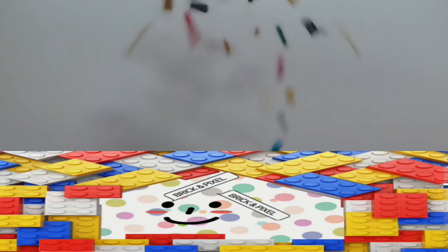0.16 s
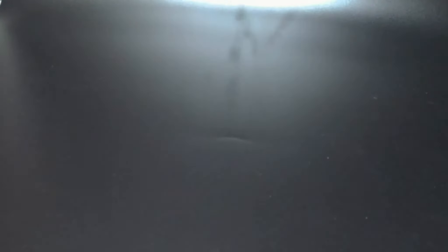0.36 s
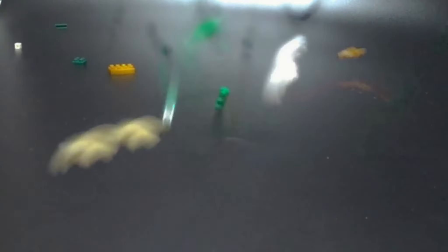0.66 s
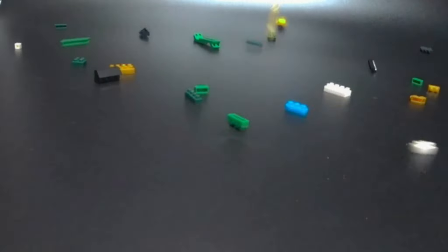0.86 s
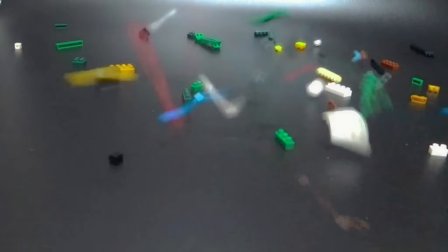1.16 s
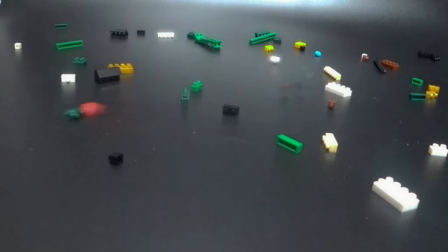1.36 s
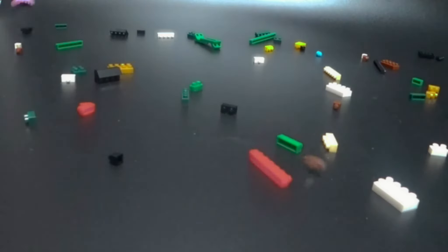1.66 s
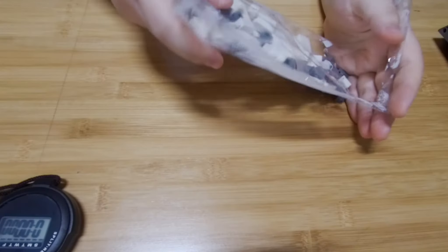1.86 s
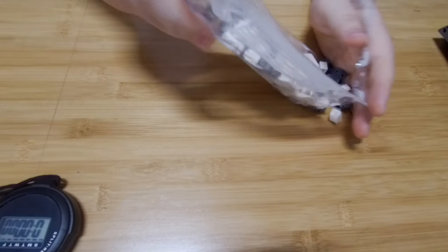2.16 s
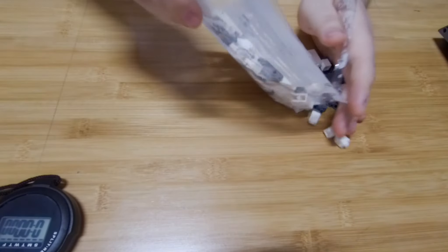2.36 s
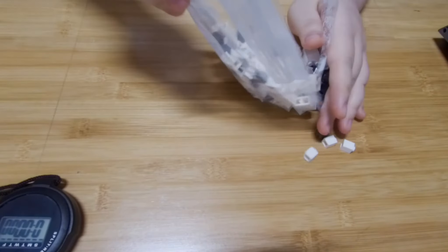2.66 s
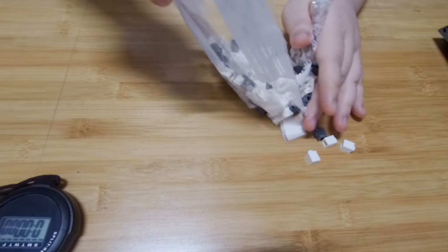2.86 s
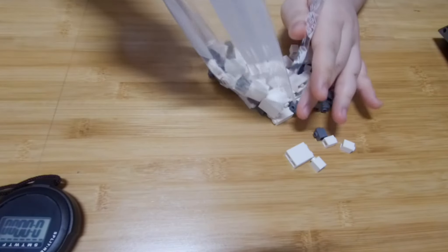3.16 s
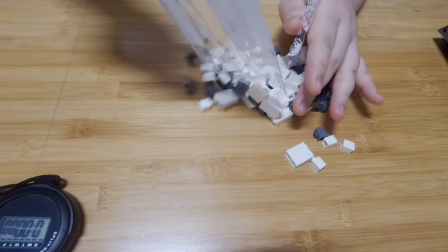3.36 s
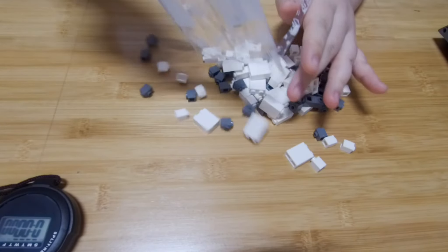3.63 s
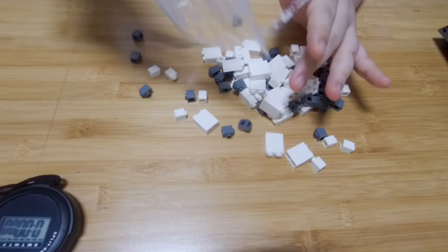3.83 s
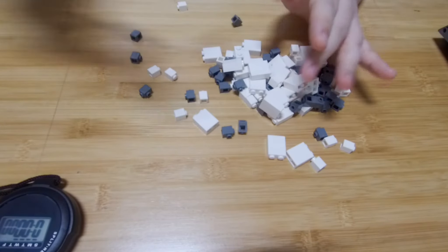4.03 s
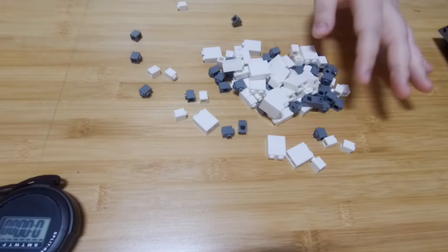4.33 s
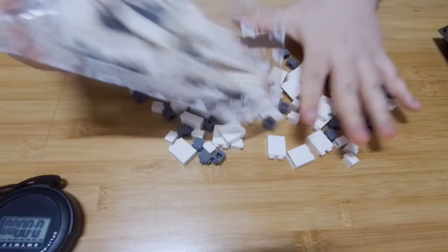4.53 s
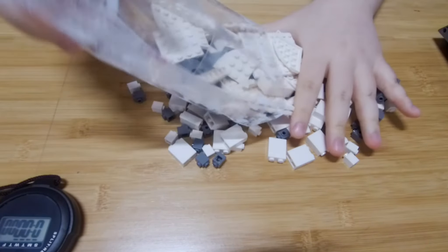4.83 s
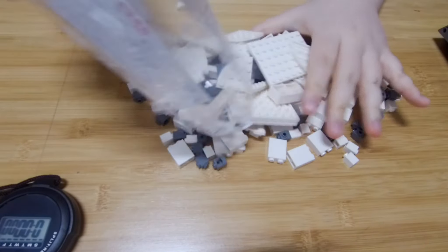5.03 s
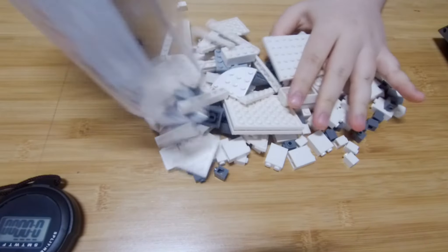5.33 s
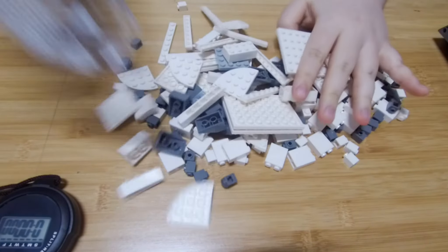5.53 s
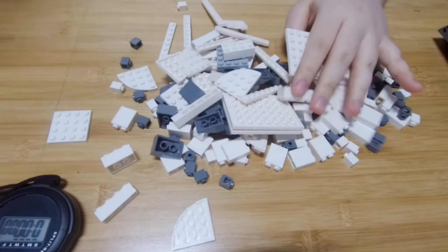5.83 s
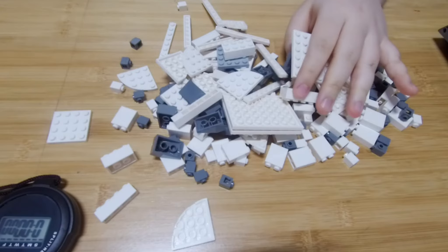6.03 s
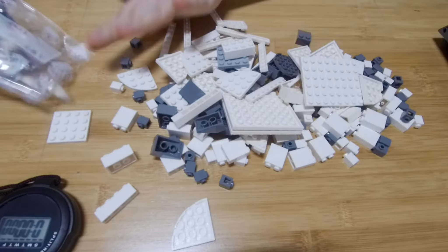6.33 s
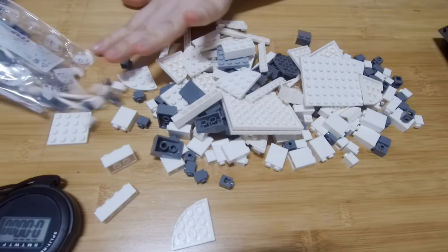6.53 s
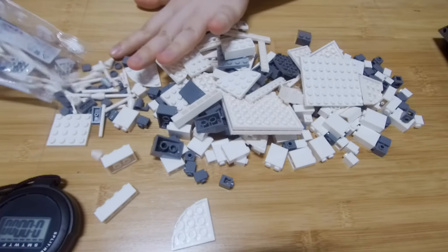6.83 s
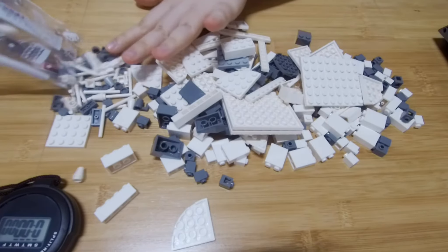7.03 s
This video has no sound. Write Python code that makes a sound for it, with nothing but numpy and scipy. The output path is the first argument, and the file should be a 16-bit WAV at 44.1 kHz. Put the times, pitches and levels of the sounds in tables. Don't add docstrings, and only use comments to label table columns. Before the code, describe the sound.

Dense, bright, crackling impacts of small plastic bricks on a hard surface, loud and close, stop abruptly. After a tiny gap, a duller indoor mono perspective: bricks slide from a crinkling plastic bag, drumming softly on wood, with one sharp clack and brief gain dropouts. A lull with faint finger taps leads to a sudden heavy slump, a thick rattling pour, a short pause, then a final softer, hissier pour.

```python
import sys
import numpy as np
from scipy import signal
from scipy.fft import rfft, irfft
from scipy.io import wavfile

SR = 44100
rng = np.random.default_rng(int(sys.argv[2]) if len(sys.argv) > 2 else 0)


def master(y):
    cut = np.clip(np.atleast_2d(y).T, -1, 1)
    pcm = np.round(cut * 32767)
    wavfile.write(sys.argv[1], SR, pcm.astype(np.int16))


def magnitude_from_level(level_db):
    exponent = np.asarray(level_db, float) / 20
    return 10 ** exponent


N = 317079

# time in seconds, peak in dB, brick pitch in Hz,
# brightness in dB.
BRICK_LANDINGS = [(0.0439, -3.5, 6520, 4), (0.0752, -5.5, 6540, 2), (0.0808, -7, 2650, 7),
                  (0.0932, -5.5, 3510, -1), (0.1159, -3, 3560, 0.5), (0.1329, -6, 7800, 13),
                  (0.1428, -2, 2690, -7.5), (0.1479, -17, 2690, 4), (0.1853, -8, 2930, 0),
                  (0.1907, -11.5, 2850, -3), (0.1958, -3.5, 2860, 12), (0.2146, -6, 9190, 17),
                  (0.2237, -6, 3230, -3.5), (0.2345, -5, 2710, 6), (0.2459, -7, 3250, -1.5),
                  (0.2582, -13.5, 3800, 3), (0.2628, -2, 3570, 0), (0.2683, -13, 3940, -2),
                  (0.2757, -7, 5800, 4), (0.2838, -6.5, 2610, 5.5), (0.2959, -6, 3920, 0.5),
                  (0.3154, -2.5, 2910, -5.5), (0.3204, -10.5, 11110, 6), (0.3313, -10, 2930, 7.5),
                  (0.3355, -3.5, 2860, 7), (0.3465, -6.5, 3960, 2), (0.3518, -3, 2860, 3.5),
                  (0.3622, -16.5, 11390, 2), (0.3764, -13.5, 14000, 8), (0.3804, -15.5, 2930, 1),
                  (0.3927, -17, 2610, 0.5), (0.3999, -13, 3320, -7), (0.4043, -5.5, 2890, -3.5),
                  (0.4202, -6.5, 8660, 8.5), (0.4258, -7, 5700, 3), (0.431, -2.5, 7580, 9.5),
                  (0.4349, -11, 3900, 8), (0.4516, -14, 3500, -0.5), (0.456, -16.5, 7350, 1),
                  (0.4611, -5.5, 2930, 7),
                  (0.4863, -8, 13500, 3), (0.4971, -2.5, 3550, -1), (0.5102, -2, 2830, -1.5),
                  (0.5245, -4.5, 2880, -6), (0.5362, -2.5, 2930, -1.5), (0.5533, -4.5, 3850, -1.5),
                  (0.5602, -2.5, 2980, -3), (0.5779, -2.5, 5560, 3.5), (0.584, -1, 5700, -1.5),
                  (0.5936, -4.5, 3850, -4.5), (0.6063, -8, 4100, 3), (0.6107, -1.5, 7600, -3),
                  (0.6172, -10, 4100, 3), (0.634, -4.5, 3810, 0), (0.6423, -3.5, 6360, -1.5),
                  (0.6465, -5, 7690, 0), (0.6573, -9.5, 6930, 6), (0.6607, -4, 2970, 2.5),
                  (0.664, -2.5, 2930, -2.5), (0.676, -5, 2930, 2), (0.6865, -6.5, 3530, -2.5),
                  (0.694, -5.5, 3530, 2.5), (0.7015, -10.5, 5620, 3.5), (0.7057, -6.5, 5640, 7.5),
                  (0.7175, -8, 6500, -2), (0.7235, -5, 3090, 1.5), (0.7301, -6.5, 3810, 3),
                  (0.735, -9, 2900, 1), (0.7465, -8, 5400, 3.5), (0.7536, -9, 9320, 5.5),
                  (0.7588, -6, 9520, 9.5), (0.7769, -4, 2910, 1.5), (0.783, -5.5, 9630, 5.5),
                  (0.8014, -10, 11630, 4.5), (0.821, -5, 6550, 3), (0.8306, -9.5, 5560, -2.5),
                  (0.8357, -8.5, 6960, -2), (0.8447, -9, 6480, -2), (0.8589, -9, 6840, 8.5),
                  (0.879, -7, 6850, 1), (0.8912, -1.5, 5430, -2.5), (0.8975, -10, 3960, -3.5),
                  (0.9178, -15.5, 8600, -5.5), (0.9224, -2.5, 3490, 3),
                  (0.984, -3.5, 5600, 3.5), (0.9998, -4.5, 3900, -2), (1.0058, -5, 6740, 11),
                 (1.0146, -8, 2740, 14), (1.0239, -11, 5100, 1.5), (1.0432, -2.5, 2920, 0),
                 (1.0601, -6, 7710, 2), (1.0742, -3.5, 3130, -0.5), (1.078, -9, 3080, -6),
                 (1.0882, -10, 2800, 6), (1.0969, -9.5, 6610, -3), (1.1066, -4, 3870, -2),
                 (1.1305, -4.5, 3540, 7), (1.1411, -4.5, 2900, 1.5), (1.1587, -3, 2900, 1.5),
                 (1.175, -12, 5700, -2), (1.1795, -2, 8600, 4.5), (1.199, -3.5, 2950, 2.5),
                 (1.2108, -6, 3010, -1), (1.216, -2.5, 2930, -3.5), (1.2276, -9, 5280, 10),
                 (1.2328, -9.5, 5660, 7), (1.2376, -6.5, 7600, 7), (1.2455, -6, 7190, 20),
                 (1.2634, -9.5, 3550, 14), (1.2691, -10, 2930, 13), (1.2746, -5, 2930, -1),
                 (1.2839, -4.5, 12000, 7), (1.2921, -6, 11300, 9), (1.2984, -11, 6700, 5),
                 (1.303, -8, 4770, 11), (1.3081, -11, 3510, 4), (1.3173, -5.5, 5950, 7.5),
                 (1.3277, -7, 2930, 5), (1.339, -2.5, 13000, 10), (1.352, -6.5, 6580, 11),
                 (1.3654, -6.5, 2820, 6), (1.374, -5.5, 2930, -2), (1.3871, -4, 5720, 3.5),
                 (1.42, -7, 2860, 1), (1.4303, -2.5, 6120, 7.5), (1.4368, -5.5, 3290, 2.5),
                 (1.448, -3.5, 2840, -1), (1.4675, -5, 5550, 8), (1.4767, -10, 2880, -4),
                 (1.4882, -11.5, 6330, 10), (1.4953, -7.5, 13500, 11.5), (1.5007, -4.5, 7860, 9)]
# time in seconds, level in dB.
FIRST_BOUNCES = [
    (0.2, -59),
    (0.24, -24),
    (0.37, -28),
    (0.44, -17),
    (0.47, -41.5),
]
SECOND_BOUNCES = [
    (0.49, -52),
    (0.51, -14.5),
    (0.6, -12),
    (0.8, -13),
    (0.9, -19),
    (0.965, -25.5),
]
THIRD_BOUNCES = [
    (0.982, -31),
    (1.0, -20),
    (1.12, -21),
    (1.2, -15),
    (1.36, -18.5),
    (1.41, -20),
    (1.51, -20),
]
# pitch in Hz, level in dB, seconds to fall by 60 dB.
HARD_TABLE_NOTES = [(485, -24, 0.25), (739, -13.5, 0.073), (980, -2, 0.06), (1236, -25, 0.11),
                    (1710, -10.5, 0.015), (2930, -1.5, 0.0089), (3540, -15, 0.035)]
# frequency in Hz, level in dB.
DROP_TONE = [(60, -47.5), (350, -28), (800, -9.5), (1900, -3), (3000, -3), (5500, -5), (9000, -4.5),
             (15000, -6)]
# frequency in Hz, width in Hz, boost in dB.
REFLECTION_DIPS = [(1464, 130, -6), (2250, 200, 0.5), (4230, 420, -5.5)]
# frequency in Hz, lead in radians.
PORT_LEAD = [(0, 0), (430, .6), (1290, 2.8), (2200, 3.5), (3100, 4.1), (4000, 6.8), (6000, 7.2),
             (16400, 6.8)]
# frequency in Hz, left minus right in dB.
PORT_LEVELS = [(60, -2), (180, 18.5), (550, 7), (1650, 9), (4970, 0.5), (15000, -2)]

# time in seconds, clatter level in dB.
FIRST_TIP_FLOW = [(1.688, -41.5), (1.8, -35.5), (1.95, -31.5), (2.2, -33.5), (2.29, -43.5), (2.42, -37),
                  (2.49, -30.5), (2.55, -36), (2.63, -34)]
FIRST_SHAKE_FLOW = [(2.7, -43.5), (2.8, -34), (2.9, -37.5), (2.99, -34), (3.2, -32.5), (3.4, -35.5),
                    (3.5, -35), (3.6, -45), (3.65, -62)]
SLUMP_FLOW = [(4.263, -18), (4.305, -16.5), (4.315, -10.5), (4.345, -14), (4.36, -25), (4.42, -35.5),
              (4.49, -45.5)]
SECOND_POUR_FLOW = [(4.51, -37), (4.63, -28), (4.695, -20.5), (4.82, -25), (5.1, -28.5), (5.23, -24),
                    (5.36, -32.5), (5.6, -36.5), (5.66, -51)]
HAND_PRESS_FLOW = [(5.67, -81), (5.68, -59), (5.746, -49.5), (5.758, -54), (5.8, -34.5), (5.87, -44.5)]
THIRD_POUR_FLOW = [(5.873, -45), (6.05, -37.5), (6.14, -33.5), (6.31, -31.5), (6.6, -31.5), (6.88, -32.5),
                   (7.0, -38), (7.13, -45), (7.19, -41)]
USUAL_FLOW = [-37, -30, -35]
# frequency in Hz, level in dB per Hz.
BRICK_TONES = [
    [(1060, -52), (1800, -8), (2650, -5.5), (3720, -0.5), (8170, -2), (8940, -2.5), (15300, -9)],
    [(1060, -34), (1800, -10), (2480, -16), (3620, -2), (6590, -3), (11600, -3.5), (15300, -10.5)],
    [(1060, -12.5), (1800, -14), (2480, -14), (3300, -12), (5460, -9.5), (8780, -8.5), (11900, -7.5),
     (15300, -12)],
]
# frequency in Hz, width in Hz, boost in dB.
SHARED_PITCHES = [
    [(3700, 210, 2.5), (5430, 180, 3), (8870, 190, 9)],
    [(3560, 200, 4)],
    [(2780, 250, 4.5), (5300, 330, 2.5), (11920, 530, 11.5), (14600, 270, 6)],
]
# frequency in Hz, level in dB per Hz.
WOOD_TONES = [
    [(24, -45), (40, -5), (146, -13.5), (259, 3), (394, -5.5), (569, -6.5), (779, 0), (1210, -6.5),
     (1540, -2.5), (2600, -15), (3380, -31), (5720, -120)],
    [(24, -35), (40, -21), (162, -15.5), (255, -1.5), (430, -13), (766, -8.5), (995, -12.5), (1460, -10),
     (2600, -21.5), (3380, -23), (5720, -120)],
    [(24, -46), (40, -20), (283, 0), (331, -8.5), (401, -4.5), (469, -5.5), (912, -4.5), (1620, -4),
     (2600, -24), (3380, -36), (5720, -120)],
]
# frequency in Hz, width in Hz, boost in dB.
WOOD_NOTES = [
    [(773, 60, 3.5), (1500, 140, 3)],
    [(248, 27, 1), (1440, 68, 1)],
    [(408, 18, 10.5), (1670, 180, 6.5)],
]
# level in dB at usual flow, change in dB per dB of flow.
DRUMMING_SHARE = [(-5, -0.02), (-6, -0.397), (-8.5, -0.3)]
FLAT_PIECES = [-14, -4, -16]
# time in seconds, shared pitches in dB, wood notes in dB.
ALIKE_AND_BARE = [(1.7, -4, 3), (2.2, -2, 3), (2.4, -3, -12), (2.95, 2, -12), (3.28, 2, -10),
                  (3.35, -10, -8), (4.9, 0, 0), (5.9, -3, 1), (6.5, 1, 0), (6.9, 0, 0), (7.19, -5, -3)]
# time in seconds, swell in dB.
SLIPPING_CLUMPS = [(1.713, 9.5), (1.729, 7), (1.792, 5), (1.832, 3.8), (1.932, 6.5), (1.991, 4.7), (2.021, 5),
                   (2.115, 9), (2.224, 6), (2.309, 13.5), (2.36, 6.5), (2.385, 4), (2.426, 9), (2.487, 9),
                   (2.567, 2), (2.602, 4), (2.63, 5), (2.681, 6.9), (2.702, 5.5), (2.732, 4), (2.801, 6),
                   (2.899, 5), (2.979, 6), (2.998, 7), (3.044, 7.5), (3.117, 3.5), (3.15, 4), (3.165, -0.5),
                   (3.215, 3.5), (3.25, 6.5), (3.271, 3), (3.285, 3.5), (3.42, 3), (3.493, 5), (3.559, 1),
                   (3.595, 2.5),
                   (4.448, 5.5), (4.558, 5), (4.7, 3.5), (4.833, 4.5), (4.947, 3.1), (4.966, 4.5), (4.982, 4),
                (5.024, 3), (5.044, 4), (5.117, 5), (5.182, 3.5), (5.202, 1), (5.234, 4), (5.252, 5),
                (5.33, 4), (5.368, 4.5), (5.414, 2), (5.45, 3), (5.505, 5.5), (5.56, 4), (5.595, 3.5),
                (5.706, 4), (5.742, 4), (5.801, 5), (5.844, 4.5), (5.923, 3.3), (6.045, 8.5), (6.098, 7),
                (6.141, 8.5), (6.162, 3.6), (6.306, 4.5), (6.378, 3), (6.392, 1.5), (6.502, 0),
                (6.579, 3.5), (6.832, 0.5), (6.892, 2.5), (6.911, 4), (7.055, 3), (7.077, 4.6)]
# time in seconds, peak in dB, pitch in Hz.
SINGLE_CLACKS = [(1.6931, -25, 8900), (1.7884, -26, 4070), (1.9298, -27, 3700), (2.3546, -20, 5720),
                 (2.383, -21.5, 5300), (2.478, 3, 8870), (4.264, -17, 3500), (4.831, -20, 11600),
                 (5.1031, -12, 3400), (5.2001, -13, 5800), (5.2213, -7.5, 11300), (5.7384, -23.5, 3520),
                 (5.44, -22, 4200), (6.0435, -24, 12200), (7.0527, -24.5, 6900), (7.187, -29, 9000)]
# time in seconds, peak in dB, pitch in Hz, table share in dB.
FINGER_TAPS = [(3.857, -37, 9300, -27), (3.873, -31.5, 2420, -1), (3.888, -42, 1500, -5),
               (3.937, -39, 2680, -4), (3.96, -42, 1700, -5), (3.997, -52, 1990, 2),
               (4.249, -26, 13700, -17), (4.445, -19, 8340, -11), (4.036, -30, 2840, 0.5),
               (4.054, -28, 2500, -2), (4.064, -35, 4550, -4), (4.092, -40, 2000, 1),
               (4.113, -40, 2740, -3), (4.127, -43, 3300, -6), (4.186, -44, 1600, -2),
               (4.203, -48, 3500, -5), (4.173, -37, 3100, -3), (5.682, -30, 5430, -16),
               (5.702, -23, 8340, -16)]
# start in seconds, length in milliseconds.
GAIN_DROPS = [(1.783, 2.9), (1.8362, 4.1), (1.907, 2.4), (1.9385, 1.8), (1.9962, 2.8), (2.0939, 2.1),
              (2.4502, 6.7), (2.4655, 16.2), (2.572, 11.5), (2.634, 28.4), (2.688, 6.3), (2.7368, 9.7),
              (2.767, 15), (2.9137, 2.5), (2.923, 12.7), (2.9416, 23.4), (3.0025, 19), (3.0689, 11),
              (3.1218, 20), (3.224, 12.6), (3.344, 20), (3.425, 14), (3.5312, 9.5), (3.57, 16.5),
              (4.5816, 6.3), (4.666, 1.6), (4.7984, 5.7), (5.028, 4.7), (5.091, 4.1), (5.1602, 12.1),
              (5.1884, 2.2), (5.2378, 2.2), (5.334, 16), (5.3814, 9.5), (5.4268, 6.1), (6.0208, 11),
              (6.2625, 2.1), (6.347, 1.7), (6.8669, 2.4), (6.896, 8.7), (6.941, 2.5), (7.135, 7.3)]

# time in seconds, level in dB.
TABLE_NUDGES = [(1.27, -55), (2.75, -55), (3.6, -54), (4.65, -50), (5.78, -55)]
# frequency in Hz, level in dB per Hz.
FIRST_ROOM = [(20, -5), (60, -0.5), (200, -3), (1500, -10), (2800, -8.5), (4200, -20), (15300, -30)]
# frequency in Hz, level in dB per Hz.
SECOND_ROOM = [(15, -29), (25, -9), (64, -6), (81, -6.5), (296, -18), (661, -15.5), (1440, -20.5),
               (2530, -22.5), (12000, -26), (15300, -22)]

SHOT_END_S, SHOT_START_S = 1.508, 1.688


def rain_of_bricks():
    drops = BRICK_LANDINGS
    brightness_db = np.array(drops)[:, 3]
    near, tail = bricks(drops, rise_s=.0004, crack_s=.0028, ring_s=.013, ring_db=-9,
                        tail_s=.052, tail_db=-14, bright_db=1.18 * brightness_db - 2)
    (bounce_db,), span = in_time([*FIRST_BOUNCES, *SECOND_BOUNCES, *THIRD_BOUNCES])
    bounce_level = span * magnitude_from_level(bounce_db - 7 + 1.8 * drift(28))
    bounces = grains(1200, spread_db=3.5, t60=.01, crack_db=0, patchy_db=2.1, size=N // 4)
    wash = magnitude_from_level(-7) * bounce_level * rng.standard_normal((2, N))

    weight_db = -.8 * brightness_db
    table = np.zeros(N)
    for hz, db, t60 in HARD_TABLE_NOTES:
        table += magnitude_from_level(db) * ring(strikes(drops, weight_db - 24, spread_db=2.5), hz, t60)
    table = signal.sosfilt(signal.butter(3, 420, "high", fs=SR, output="sos"), table)

    boosts = [(hz, 2.1 / t60, 4) for hz, db, t60 in HARD_TABLE_NOTES] + REFLECTION_DIPS
    direct = colour(near + bounce_level * bounces, DROP_TONE, boosts)
    diffuse = colour(tail + wash, DROP_TONE, boosts)
    return ports(magnitude_from_level(4.5) * direct + table) + magnitude_from_level(5.5) * diffuse


def bricks(hits, rise_s, crack_s, ring_s, ring_db, tail_s, tail_db, bright_db=0):
    t = np.arange(3000) / SR
    noise = np.zeros((2, 3, N + t.size))
    tones = np.zeros(N + t.size)
    rise = np.minimum(t / rise_s, 1) ** 2
    late = (t - rise_s).clip(0)
    shape = rise * decay(late, crack_s)
    for (s, db, hz, *_), bright in zip(hits, np.broadcast_to(bright_db, len(hits))):
        here = slice(round(s * SR), round(s * SR) + t.size)
        ratios = magnitude_from_level(rng.normal(0, [[.05], [2], [4], [4]]))
        heights = magnitude_from_level(rng.normal([[0], [-6], [-6], [-6]], 2))
        pitches = np.minimum(hz * ratios, 15500)
        notes = (heights * np.sin(2 * np.pi * pitches * t)).sum(0)
        tones[here] += magnitude_from_level(db + ring_db) * rise * notes * decay(late, ring_s)

        crack, shared, *own = rng.standard_normal((4, t.size))
        crack = rms_one(crack * shape) * np.sqrt(np.mean(shape ** 2))
        tail = magnitude_from_level(tail_db) * rise * (np.array(own) + .55 * shared) * decay(late, tail_s)
        half_db = np.minimum([[[-bright]], [[bright]]], 0)
        noise[..., here] += magnitude_from_level(db + half_db) * [crack, *tail]
    dull, bright = noise
    if np.any(bright_db):
        low_pass = signal.butter(2, 5500, "low", fs=SR, output="sos")
        high_pass = signal.butter(2, 5500, "high", fs=SR, output="sos")
        noise = signal.sosfilt(low_pass, dull + 1e-18) - signal.sosfilt(high_pass, bright + 1e-18)
    else:
        noise = dull
    return (noise[0] + tones)[:N], noise[1:, :N]


def ports(x):
    hz = np.fft.rfftfreq(N, 1 / SR)
    lead = np.interp(hz, *np.transpose(PORT_LEAD))
    half = np.sqrt(magnitude_from_level(at_hz(PORT_LEVELS, hz))) * np.exp(.5j * lead)
    return irfft(rfft(x) * np.array([half, 1 / half]), N)


def pours():
    out = np.zeros(N)
    lumps_db = 1.1 * drift(70) + surging()
    clatter = grains(3500, spread_db=3.5, t60=.014, crack_db=-1, patchy_db=3.3, size=N)
    clatter += magnitude_from_level(-3.5) * rng.standard_normal(N)
    plates = grains(350, spread_db=4, t60=.035, crack_db=-9, patchy_db=7, size=N)
    crackle = np.gradient(film_snaps())
    drumming = rng.standard_normal(N) * magnitude_from_level(1.2 * drift(25))
    (same_db, bare_db), _ = in_time(ALIKE_AND_BARE)
    flows = [[*FIRST_TIP_FLOW, *FIRST_SHAKE_FLOW],
             [*SLUMP_FLOW, *SECOND_POUR_FLOW, *HAND_PRESS_FLOW],
             THIRD_POUR_FLOW]
    for bag, flow in enumerate(flows):
        (level_db,), span = in_time(flow)
        film_db = -.4 * (level_db + 36)
        rustle = clatter + magnitude_from_level(FLAT_PIECES[bag]) * plates + magnitude_from_level(film_db) * crackle
        plain = colour(rustle, BRICK_TONES[bag])
        pitched = colour(rustle, BRICK_TONES[bag], SHARED_PITCHES[bag])
        top = rms_one(plain + magnitude_from_level(same_db + 2.5 * drift(25)) * (pitched - plain))

        dull = colour(drumming, WOOD_TONES[bag])
        ringing = colour(drumming, WOOD_TONES[bag], WOOD_NOTES[bag])
        low = rms_one(dull + magnitude_from_level(bare_db) * (ringing - dull))
        share_db, slope = DRUMMING_SHARE[bag]
        wood_db = share_db + slope * (level_db - USUAL_FLOW[bag])
        out += span * magnitude_from_level(level_db + lumps_db - 1) * (top + magnitude_from_level(wood_db) * low)
    return out + clacks() + taps()


def grains(per_s, spread_db, t60, crack_db, patchy_db, size):
    heights = magnitude_from_level(spread_db * np.minimum(rng.exponential(1, size), 3.5))
    clicks = heights * rng.choice([-1, 1], size) * (rng.random(size) < per_s / SR)
    pitches = np.linspace(2000, 15300, 48)
    dealt = rng.integers(0, 48, size)
    patch = np.arange(size) // 2500
    favour = magnitude_from_level(patchy_db * rng.standard_normal((48, size // 2500 + 1)))[dealt, patch]
    rings = sum(ring(clicks * favour * (dealt == k), hz, t60) for k, hz in enumerate(pitches))
    return np.pad(rms_one(rms_one(rings) + magnitude_from_level(crack_db) * rms_one(clicks)), (0, N - size))


def surging():
    rise_s, fall_s = .0037, .0085
    swell = np.zeros(N + SR)
    t = np.arange(-1000, 2000) / SR
    shape = np.exp(-(t / np.where(t < 0, rise_s, fall_s)) ** 2)
    for s, db in SLIPPING_CLUMPS:
        i = round(s * SR)
        swell[i - 1000:i + 2000] += db * shape
    return swell[:N]


def film_snaps():
    snaps = (rng.random(N) < 350 / SR) * 30 * rng.uniform(-1.02, 1, N) ** 3
    trips_s = np.array(GAIN_DROPS)[:, 0] - .0012
    snaps[(trips_s * SR).astype(int)] = 20.6
    return snaps


def clacks():
    near, tail = bricks(SINGLE_CLACKS, rise_s=.0025, crack_s=.011, ring_s=.02, ring_db=-8,
                        tail_s=.028, tail_db=-28)
    sound = magnitude_from_level(-2.5) * colour(near + tail[0], BRICK_TONES[0])
    return sound + knocks(SINGLE_CLACKS, share_db=-1.5, t60=.018)


def taps():
    near, tail = bricks(FINGER_TAPS, rise_s=.002, crack_s=.0092, ring_s=.028, ring_db=-6,
                        tail_s=.08, tail_db=-8)
    sound = magnitude_from_level(-7) * colour(near + tail[0], BRICK_TONES[0])
    return sound + knocks(FINGER_TAPS, np.array(FINGER_TAPS)[:, 3] + 8, t60=.056)


def knocks(hits, share_db, t60):
    blows = np.abs(strikes(hits, share_db, spread_db=0)) + 1e-18
    burst = signal.lfilter([1], [1, -magnitude_from_level(-60 / (t60 * SR))], blows)
    return colour(burst * rng.standard_normal(N), WOOD_TONES[0])


def ducking():
    duck_db = -24.5
    s, ms = np.transpose(GAIN_DROPS)
    end = s + ms / 1000
    corners = np.transpose([s - .0006, s + .0004, end - .002, end + .0035])
    gain_db = np.tile([0, duck_db, duck_db, 0], len(s))
    return magnitude_from_level(np.interp(np.arange(N) / SR, corners.ravel(), gain_db))


def nudges():
    t = np.arange(N) / SR
    swell = sum(magnitude_from_level(db) * np.exp(-((t - s) / .07) ** 2) for s, db in TABLE_NUDGES)
    low_band = signal.butter(2, [25, 130], "band", fs=SR, output="sos")
    return swell * rms_one(signal.sosfilt(low_band, rng.standard_normal(N)))


def first_room():
    noise = rng.standard_normal(N) + .41 * rng.standard_normal((2, N))
    return magnitude_from_level(-51.5) * rms_one(colour(noise, FIRST_ROOM))


def second_room():
    whistle = [(12160, 240, 7.3)]   # Hz, width Hz, boost dB
    air = rms_one(colour(rng.standard_normal(N), SECOND_ROOM, whistle))
    return magnitude_from_level(-56 + np.tanh(drift(1.8))) * air


def strikes(hits, share_db, spread_db):
    rows = np.array(hits)
    clicks = np.zeros(N)
    heights_db = rows[:, 1] + share_db + rng.normal(0, spread_db, len(rows))
    clicks[np.round(rows[:, 0] * SR).astype(int)] = magnitude_from_level(heights_db)
    return clicks


def ring(clicks, hz, t60):
    r = magnitude_from_level(-60 / (t60 * SR))
    w = 2 * np.pi * min(hz, 18000) / SR
    return signal.lfilter([0, np.sin(w)], [1, -2 * r * np.cos(w), r * r], clicks + 1e-18)


def decay(t, t60):
    return magnitude_from_level(-60 * t / t60)


def drift(rate):
    r = np.exp(-2 * np.pi * rate / SR)
    return rms_one(signal.lfilter([1], [1, -2 * r, r * r], rng.standard_normal(N + SR))[SR:])


def colour(x, spectrum, rings=()):
    hz = np.fft.rfftfreq(4096, 1 / SR)
    db = at_hz(spectrum, hz) + sum(boost / (1 + (2 * (hz - f) / w) ** 2) for f, w, boost in rings)
    cepstrum = irfft(np.log(magnitude_from_level(db)))
    cepstrum[1:2048] *= 2
    cepstrum[2049:] = 0
    response = irfft(np.exp(rfft(cepstrum)))
    y = signal.fftconvolve(np.atleast_2d(x), response[None], axes=1)
    return y[:, :N].reshape(np.shape(x))


def at_hz(points, hz):
    f, db = np.transpose(points)
    return np.interp(np.log(hz + 1), np.log(f + 1), db)


def in_time(rows):
    s, *columns = np.transpose(rows)
    t = np.arange(N) / SR
    return [np.interp(t, s, c) for c in columns], (t >= s[0]) & (t <= s[-1])


def rms_one(x):
    return x / np.sqrt(np.mean(x ** 2) + 1e-20)


def scene():
    t = np.arange(N) / SR
    after = t - SHOT_END_S
    fade = np.where(after < 0, 1, magnitude_from_level(-27) * decay(after.clip(0), .035))
    first_shot = (rain_of_bricks() + first_room()) * fade

    top_cut = signal.cheby2(12, 50, 15700, fs=SR, output="sos")
    table = signal.sosfilt(top_cut, pours() + second_room()) * (t > SHOT_START_S)
    bass = signal.sosfilt(signal.butter(2, 150, fs=SR, output="sos"), table)
    return first_shot + nudges() + (table - bass) * ducking() + bass


def band_limit(x):
    return signal.sosfilt(signal.butter(12, 16810, fs=SR, output="sos"), x)


def record(dry):
    top_cut = signal.cheby2(14, 60, 16300, fs=SR, output="sos")
    rounded = 1.265 * np.tanh(dry / 1.291)
    return band_limit(signal.sosfilt(top_cut, rounded))


dry = scene()
out = record(dry)
master(out)
```